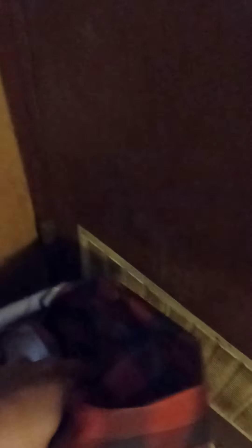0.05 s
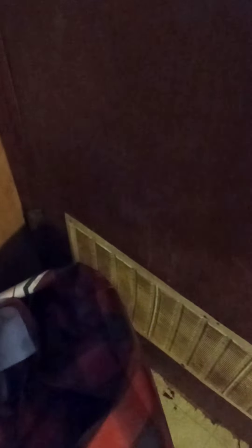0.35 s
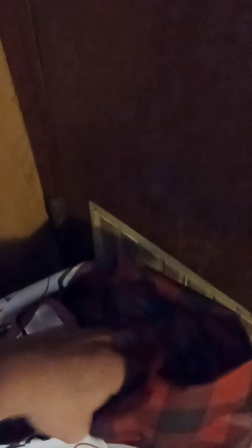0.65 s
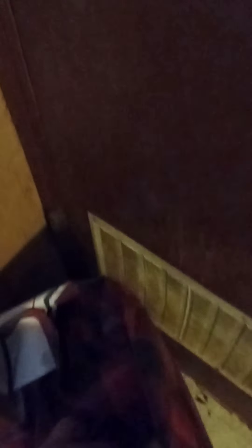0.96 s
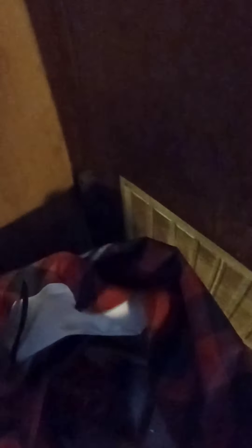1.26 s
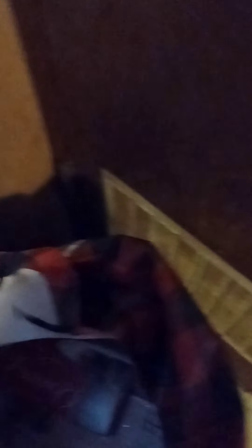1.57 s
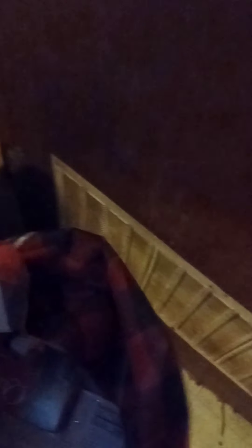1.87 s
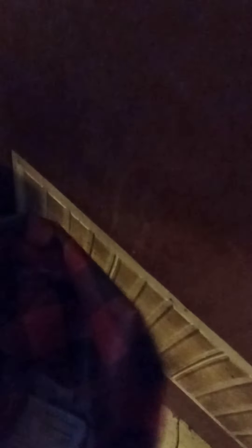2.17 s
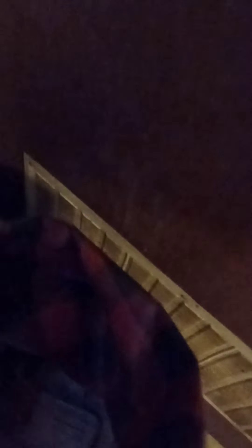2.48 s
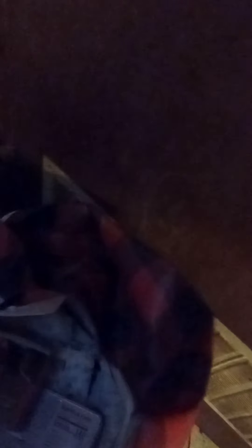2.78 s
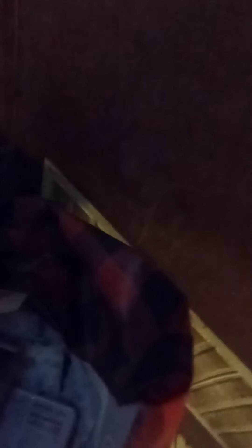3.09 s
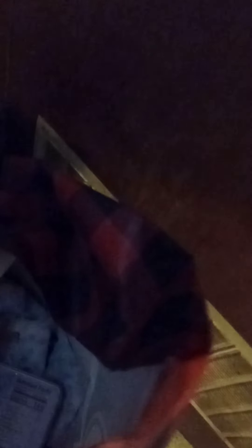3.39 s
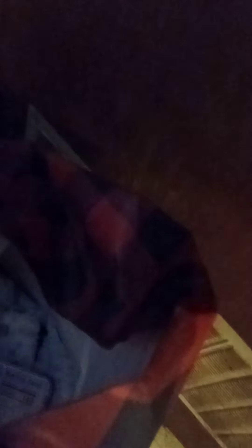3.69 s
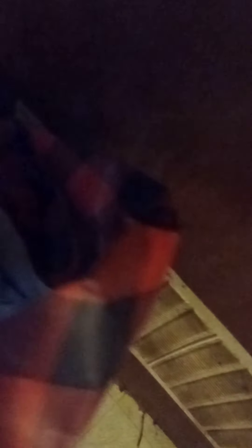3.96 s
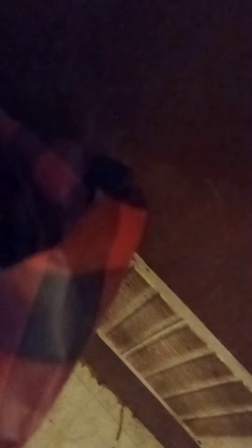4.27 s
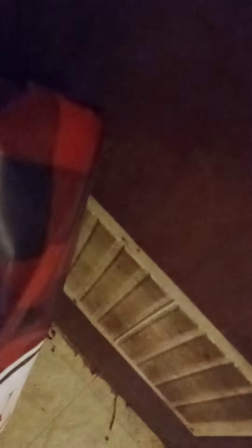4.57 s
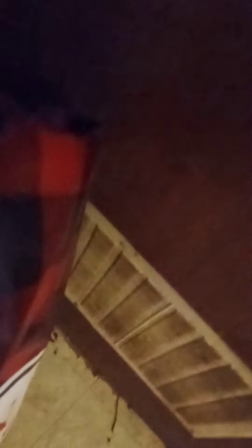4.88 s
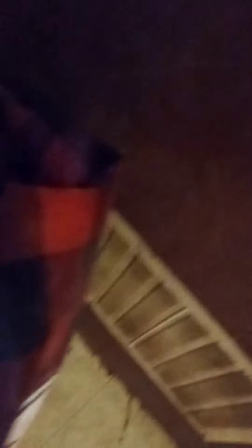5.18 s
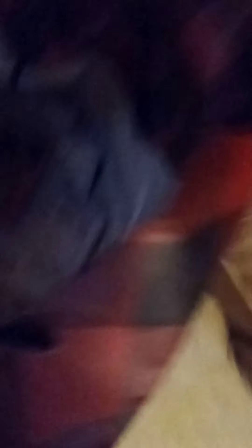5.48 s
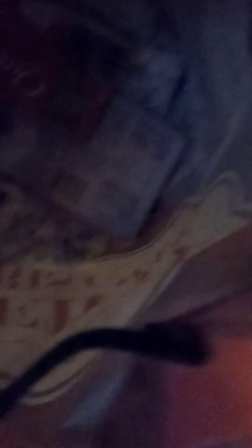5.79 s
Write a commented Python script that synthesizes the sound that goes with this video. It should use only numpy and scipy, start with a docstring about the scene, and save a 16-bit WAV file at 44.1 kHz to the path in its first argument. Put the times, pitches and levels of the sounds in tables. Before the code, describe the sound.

Someone rummages through a pile of clothes right at a phone microphone in a small room. For about three seconds cloth rubs and crinkles in uneven strokes, with many sharp snaps of the folds and a few soft bumps. The rustling then drops away and small objects knock and click one at a time or in quick clusters, growing quiet at the end over a faint hiss.

```python
"""Rummaging through clothes

A small room, with the pile right at a phone's microphone. For three seconds cloth rubs, its fibres
catching and slipping, and folds snap; then single objects knock and click. Soft bumps come as the pile
shifts. Low tones ring on and the walls answer over a faint hiss; gain control ducks loud snaps."""
import sys
import numpy as np
from scipy import signal
from scipy.fft import rfft, irfft
from scipy.io import wavfile
from scipy.ndimage import uniform_filter1d

SR = 44100
rng = np.random.default_rng(int(sys.argv[2]) if len(sys.argv) > 2 else 0)


def wav_record(signal):
    """Record a signal, one row per channel, as 16-bit PCM in the file named by sys.argv[1]."""
    frames = np.transpose(np.atleast_2d(signal))
    bounded = np.clip(frames, -1, 1)
    # unit amplitude maps onto the largest positive 16-bit level
    quanta = np.round(bounded * 32767).astype(np.int16)
    wavfile.write(sys.argv[1], SR, quanta)


N = 262164

# Strokes of the hand through the cloth; flap and fizz are relative to the level.
# start_s, length_s, level_db, flap_db, fizz_db
HAND_STROKES = [(0, 0.005, -34.5, -4, -16.5), (0.128, 0.033, -36.5, -7, -1), (.19, 0.17, -31.5, -3.5, -7),
                (0.329, 0.26, -26.5, -12, -8.5), (0.628, 0.33, -39, -5, -6.5), (0.81, 0.22, -35, -5, -0.5),
                (0.975, 0.098, -27.5, -2, -12), (1.116, 0.077, -24.5, -9, -6), (1.243, 0.15, -25.5, -5, -8),
                (1.44, 0.053, -20.5, -1.5, -8.5), (1.542, 0.15, -36.5, 4.5, -9.5),
                (1.713, 0.26, -41.5, -7.5, -2), (2.056, 0.12, -40, -13, -12), (2.14, 0.33, -32.5, -6, -5.5),
                (2.48, 0.16, -53, -17, 8.5), (2.589, 0.27, -29.5, -13.5, -8.5), (2.734, 0.18, -32, -3, -4),
                (3.005, 0.18, -47, -3, -4), (3.184, 0.044, -42, -4, -2.5), (3.453, 0.2, -54.5, 1, -2.5),
                (3.854, 0.09, -46, 2, -2.5), (4.251, 0.067, -50, -12.5, -7.5),
                (4.39, 0.4, -63.5, -1.5, -0.5), (4.741, 0.094, -41, 0.5, -19),
                (5.123, 0.028, -38.5, -3, -9.5), (5.838, 0.0078, -61, -9, -3)]
def hand_strokes(attack_s=0.0066, release_db_per_s=163):
    """Gains of body, flap and fizz: cloth slides at once and settles after the hand stops."""
    power = np.zeros((3, N))
    for start_s, length_s, level_db, flap_db, fizz_db in HAND_STROKES:
        t = np.arange(N) / SR - start_s
        pressure = np.clip(t / attack_s, 0, 1) * amp(-release_db_per_s * np.clip(t - length_s, 0, 1))
        power += np.outer(amp(level_db + np.array([0, flap_db, fizz_db])), pressure) ** 2
    return np.sqrt(power)


# Spectrum of cloth rubbing right at the microphone: frequency_hz, gain_db
CLOTH_SPECTRUM = [(35, -77), (60, -42), (227, -9), (566, -2), (1110, -5), (1340, -1.5), (1780, 0),
                  (2470, -4), (2770, -6), (4530, -8.5), (6280, -17.5), (7570, -16.5), (11000, -21),
                  (14900, -19), (16000, -30)]
def cloth_rub(slips_per_s=1600, spread_db=1.0, flutter_db=4.5):
    """Fibres catch and slip in a dense train of tiny clicks whose force flutters with the hand."""
    body_gain, flap_gain, fizz_gain = hand_strokes()
    clicks = (rng.random(N) < slips_per_s / SR) * rng.choice([-1, 1], N)
    clicks = clicks * amp(spread_db * np.minimum(rng.exponential(1, N), 4))
    catches = unit(clicks) * amp(flutter_db * wander(47))
    friction = colour(shifting_folds(catches + rng.standard_normal(N), depth_db=2.5), CLOTH_SPECTRUM)
    flap = unit(band(friction, 720, "low") * amp(5.1 * wander(10.7)))  # loose cloth flaps in lumps
    body = band(friction, [900, 6000], "band")
    body = unit(body + 1.26 * resonate(body, 2380, 260))
    body = unit(body + 0.39 * creases())
    # weave over weave: a fine dry hiss
    sliding = 0.39 * catches + 0.45 * thread_ticks() + rng.standard_normal(N) * amp(2.0 * wander(46))
    sliding = shifting_folds(sliding, depth_db=1.5, size=256)
    fizz = unit(band(colour(sliding, CLOTH_SPECTRUM), 4590, "high"))
    return flap_gain * flap + body_gain * body + fizz_gain * fizz


def shifting_folds(x, depth_db, size=512):
    """Shifting folds favour now one band, now another."""
    spectra = signal.stft(x, nperseg=size)[2]
    patches = uniform_filter1d(rng.standard_normal(spectra.shape), size=8, axis=0)
    patches = uniform_filter1d(patches, size=6, axis=1)
    return signal.istft(spectra * amp(depth_db * unit(patches)), nperseg=size)[1][:N]


def creases(per_s=130, spread_db=7.5, ring_s=0.00071, pitches=16):
    """Small creases give way at random, each ringing for a few milliseconds at its own pitch."""
    t, crackle = np.arange(600) / SR, np.zeros(N)
    for hz in np.geomspace(1100, 4200, pitches):
        ring = t * np.exp(-t / ring_s) * np.sin(2 * np.pi * hz * t) / np.sqrt(hz)
        crackle += signal.oaconvolve(random_pulses(per_s / pitches, spread_db), ring)[:N]
    return unit(crackle)


def thread_ticks(per_s=35, spread_db=-1.0, decay_s=0.00053):
    """Now and then a single thread snags and lets go with a bright tick."""
    snags = random_pulses(per_s, spread_db)
    envelope = signal.lfilter([1], [1, -np.exp(-1 / (decay_s * SR))], snags)
    return unit(envelope * rng.standard_normal(N))


# Folds snapping at the microphone, crack relative to level: start_s, level_db, ring_hz, crack_db
FOLD_SNAPS = [(0.083, -16, 863, -11.5), (0.1888, -21, 1370, -29), (.197, -24, 1370, -28.5),
              (0.2487, -20, 920, -42), (0.279, -19.5, 2230, -8.5), (0.3176, -17.5, 2130, -11),
              (0.338, -32, 2400, -9), (0.4203, -17, 2000, -7.5), (0.4978, -16.5, 1520, -15),
              (0.5123, -16, 2200, -6), (0.5428, -15.5, 2000, -6.5), (.826, -30, 2440, -5.5),
              (0.936, -26.5, 790, -10), (0.9983, -21, 2490, -11), (1.1194, -23.5, 2590, 8.5),
              (1.2295, -12.5, 2194, -6), (1.4495, -16, 2110, -3.5), (1.5627, -19.5, 2450, -4.5),
              (1.579, -22.5, 2110, -6), (1.657, -20, 1720, -15.5), (1.7506, -19, 1410, -9.5),
              (1.786, -20.5, 2380, -0.5), (2.104, -34.5, 890, -17), (2.2016, -17, 2640, -9.5),
              (2.261, -14.5, 2300, -8), (2.3309, -19.5, 1600, -8.5), (2.3792, -24.5, 2280, -6),
              (2.4169, -15.5, 1720, -12.5), (2.638, -23, 2680, -3), (2.754, -12, 970, -15.5),
              (2.772, -12, 2370, -4), (2.782, -20, 2400, 0), (2.7964, -18, 2210, -2),
              (2.839, -12, 1980, -1), (2.8887, -14, 2160, -10)]
def snapping_folds():
    """Each fold gives way in a burst of slips."""
    folds = np.zeros(N)
    for start_s, *tone in FOLD_SNAPS:
        add(folds, start_s, snap(slips(length_s=0.0044), *tone))
    return folds


# Objects knocking close by; the last three columns are relative to the level.
# start_s, level_db, ring_hz, crack_db, room_send_db, modes_send_db
OBJECT_KNOCKS = [(3.2401, -15.5, 1885, -10.5, -14, -2), (3.5517, -36, 640, -26, -8, 9),
                 (3.5742, -23, 726, -11, -15.5, 10.5), (3.7385, -17, 1010, -11, -11, 1),
                 (3.8025, -19, 1660, -9, -14.5, 2), (3.848, -30, 890, -15, -5, -1),
                 (3.912, -34, 1820, -15, 0, -3), (3.9191, -15.5, 2510, -11, -11.5, -9),
                 (3.9556, -19.5, 1670, -11.5, -9, 4.5), (3.974, -23.5, 1900, 4, -11.5, -7),
                 (4.0731, -31, 940, -10, -8, 5.5), (4.3906, -42.5, 1980, -4, -6, 0),
                 (4.5822, -38, 2160, -8, -5, -4), (4.6175, -44, 1300, -6, -15, -6),
                 (4.666, -30.5, 1850, -10.5, -11.5, -19), (4.7508, -16.5, 2450, -4.5, -7.5, -5),
                 (5.034, -29, 960, -34, -14.5, 4), (5.054, -36, 1400, -26, -4, 2),
                 (5.0898, -17.5, 3300, -6, -15, 7), (5.092, -19.5, 1110, -20, -15.5, 5.5),
                 (4.534, -70, 2440, 16, -4, -3), (5.273, -56.5, 4100, 4, -7, -3),
                 (5.3693, -34.5, 2350, -5, -13, -1), (5.4894, -48.5, 1290, -26, 0, -3),
                 (5.521, -45.5, 1930, 2, -13.5, 12), (5.6221, -23.5, 2020, -21, -17, -1)]
def knocking_objects():
    """Brief contacts: their direct sound, and the blows they pass to the low modes and the walls."""
    knocks, to_modes, to_room = np.zeros((3, N))
    impulses = np.tile(signal.unit_impulse(4096), (3, 1))
    for start_s, *tone, room_send_db, modes_send_db in OBJECT_KNOCKS:
        add(knocks, start_s, snap(slips(length_s=0.0044), *tone))
        # summed over the whole contact, the slips reach the modes and the walls as one smooth blow
        blow = snap(impulses, *tone, ring_share=0.083)
        add(to_modes, start_s, amp(modes_send_db) * blow)
        add(to_room, start_s, amp(room_send_db) * blow)
    return knocks, to_modes, to_room


def slips(length_s, size=4096):
    """A burst of quick slips as three drives: longest for the thud, then the body, then the crack."""
    t = np.arange(size) / SR
    release = np.exp(-(t / length_s) ** 2 * 0.36) + 0.27 * np.exp(-t / 0.012)
    force = (1 - np.exp(-t / 0.00029)) * release
    forces = np.array([force + 0.27 * np.exp(-t / 0.016), force, force * np.exp(-t / 0.01)])
    return forces * rng.standard_normal((3, size)) * amp(2.8 * rng.standard_normal(size))


# Spectrum of a snap or knock at close range: frequency_hz, gain_db
SNAP_SPECTRUM = [(50, -46.5), (120, -24), (250, -3), (600, 1.5), (1200, 2), (2400, 3), (3300, -2.5),
                 (5000, -6), (8000, -15.5), (10000, -17), (16000, -24.5)]
def snap(drives, level_db, ring_hz, crack_db, ring_s=0.0012, ring_share=0.7):
    """What a fold or an object makes of a blow: a crack, then a short ring over a low thud."""
    t = np.arange(drives.shape[1]) / SR
    thud, body, crack = (colour(drive, SNAP_SPECTRUM) for drive in drives)
    thud = band(thud, 667, "low")
    # small, stiff things and sharp blows thud less
    thud_db = -9.5 - 5 * np.log2(ring_hz / 1800) - 0.19 * (level_db + 20)
    body_top_hz = np.clip(2.56 * ring_hz, 1000, 3200)  # things that ring low sound duller
    body = band(body, [body_top_hz / 4.28, body_top_hz], "band")
    ring = t * np.exp(-t / ring_s) * np.sin(2 * np.pi * ring_hz * t)
    body = unit(body) + 0.34 * unit(resonate(body, ring_hz, ring_hz / 4)) + ring_share * unit(ring)
    crack_top_hz = np.clip(18000 * amp(1.01 * crack_db), 4000, SR / 2.2)  # softer contacts are duller
    crack = band(band(crack, 3490, "high"), crack_top_hz, "low", order=2)
    sound = unit(body) + amp(thud_db) * unit(thud) + amp(crack_db) * unit(crack)
    return amp(level_db) * sound * np.sqrt(0.012 * SR / len(t))  # level: the body's energy over 12 ms


# Soft bumps close by as the pile shifts: start_s, level_db, pitch_hz
PILE_BUMPS = [(0.249, -17, 438), (0.828, -25, 250), (1.655, -15, 285), (1.751, -20.5, 384),
              (2.116, -32, 333), (3.142, -33, 253), (3.729, -31, 485), (4.749, -21, 242),
              (4.777, -25.5, 247.5), (5.438, -42.5, 242), (5.457, -44.5, 339), (5.522, -33.5, 497),
              (5.788, -57, 147)]
def soft_bumps(rise_s=0.00093, decay_s=0.016):
    """Padded blows, each one damped low swing with a dull puff."""
    t, bumps = np.arange(SR // 8) / SR, np.zeros(N)
    swell = (1 - np.exp(-t / rise_s)) * np.exp(-t / decay_s)
    for start_s, level_db, hz in PILE_BUMPS:
        puff = unit(band(rng.standard_normal(len(t)), [0.61 * hz, 2.5 * hz], "band", order=2))
        bump = swell / swell.max() * (0.61 * np.sin(2 * np.pi * hz * t) + 0.52 * puff)
        add(bumps, start_s, amp(level_db) * band(bump, 0.62 * hz, "high"))
    return bumps


# A low room resonance and two hollow tones that ring after each blow: pitch_hz, relative_db, t60_s
LOW_MODES = [(248.2, -19, 0.4), (564, -5.5, 0.1), (765.4, 0, 0.13)]
def low_ring(x):
    """Every blow sets the same few low modes ringing."""
    t = np.arange(SR // 3) / SR
    rings = [amp(db - 60 * t / t60) * np.sin(2 * np.pi * hz * t) for hz, db, t60 in LOW_MODES]
    return signal.oaconvolve(x, 0.0067 * sum(rings))[:N]


# Decay of the small room: frequency_hz, t60_s
ROOM_DECAY = [(150, 0.31), (400, 0.21), (1000, 0.3), (2800, 0.35), (7300, 0.42), (15000, 0.32)]
# Tone of its reflections at the microphone: frequency_hz, gain_db
ROOM_SPECTRUM = [(100, 14.5), (300, 11), (700, 9), (2000, 2), (7500, 3), (14000, -5.5)]
def small_room(x, first_echo_s=0.0054, echoes_per_s=3000):
    """Scattered reflections off near walls, each band dying at its own speed."""
    size = SR // 2
    echoes = rng.choice([-1., 1.], size) * (rng.random(size) < echoes_per_s / SR)
    echoes *= np.arange(size) > first_echo_s * SR
    hz, t, spectra = signal.stft(echoes, SR, nperseg=256)
    decay = amp(-60 * t / curve(ROOM_DECAY, hz)[:, None])
    tail = signal.istft(spectra * decay, SR, nperseg=256)[1]
    return signal.oaconvolve(x, colour(tail / np.linalg.norm(tail), ROOM_SPECTRUM))[:N]


# Noise floor at the microphone: frequency_hz, gain_db
HISS_SPECTRUM = [(30, -28.5), (70, 4.5), (150, 1), (300, -1), (1000, -13.5), (2500, -10.5), (7700, -7.5),
                 (9000, -14.5), (16000, -4.5)]
def faint_hiss(level_db=-63):
    """Steady noise behind everything."""
    return amp(level_db) * unit(colour(rng.standard_normal(N), HISS_SPECTRUM))


def amp(db):
    return 10 ** (np.asarray(db) / 20)


def unit(x):
    return x / np.sqrt(np.mean(x ** 2) + 1e-20)


def curve(points, hz):
    """Joins (frequency_hz, value) points by lines on a log frequency axis."""
    frequencies, values = np.transpose(points)
    return np.interp(np.log(hz + 1), np.log(frequencies + 1), values)


def add(mix, start_s, sound):
    part = mix[round(start_s * SR):][:len(sound)]
    part += sound[:len(part)]


def colour(x, spectrum, size=2048):
    """Causal filter with the given spectrum, so that attacks stay sharp."""
    log_gain = np.log(amp(curve(spectrum, abs(np.fft.fftfreq(size, 1 / SR)))))
    taps = np.fft.ifft(np.exp(np.conj(signal.hilbert(log_gain)))).real
    return signal.oaconvolve(x, taps[:size // 2])[:len(x)]


def band(x, hz, kind, order=3):
    return signal.sosfilt(signal.butter(order, hz, kind, fs=SR, output="sos"), x)


def resonate(x, hz, width_hz):
    return signal.lfilter(*signal.iirpeak(hz, hz / width_hz, fs=SR), x)


def wander(rate_hz):
    """Smooth random motion of rms 1 that changes about rate_hz times a second."""
    rolloff = 1 + (np.fft.rfftfreq(N, 1 / SR) / rate_hz) ** 4
    return unit(irfft(rfft(rng.standard_normal(N)) / rolloff, N))


def random_pulses(per_s, spread_db):
    """Impulses of uneven size at random times."""
    return (rng.random(N) < per_s / SR) * amp(spread_db * np.minimum(rng.exponential(1, N), 3))


def scene():
    """Cloth, folds, bumps and knocks at the microphone, the room behind them, and a faint hiss."""
    folds = snapping_folds()
    bumps = soft_bumps()
    knocks, to_modes, to_room = knocking_objects()
    rub = cloth_rub()
    ringing = low_ring(to_modes + 0.47 * folds + 0.055 * rub + 0.54 * bumps)
    walls = small_room(to_room + amp(-13) * folds + amp(-20) * (rub + bumps))
    return (rub + folds + knocks + bumps + ringing + walls + faint_hiss())[None]


def record(dry, threshold_db=-21, squeeze=0.41, peak_fall_db_per_s=130, top_hz=16200):
    """The phone's microphone port rings in the treble; gain control ducks loud snaps; the top is cut."""
    mic = dry[0] + 1.26 * resonate(dry[0], 7640, 770)
    power_db = 10 * np.log10(abs(uniform_filter1d(mic ** 2, size=130)) + 1e-12)
    fall_db = np.arange(N) / SR * peak_fall_db_per_s
    peak_db = np.maximum.accumulate(power_db + fall_db) - fall_db
    over_db = np.maximum(peak_db - threshold_db, 0)
    ducked = mic / amp(squeeze * uniform_filter1d(over_db, size=60))
    lowpass = signal.firwin(401, top_hz, window=("kaiser", 8), fs=SR)
    return signal.oaconvolve(ducked, lowpass, "same")[None]


dry = scene()
out = record(dry)
wav_record(out)
```